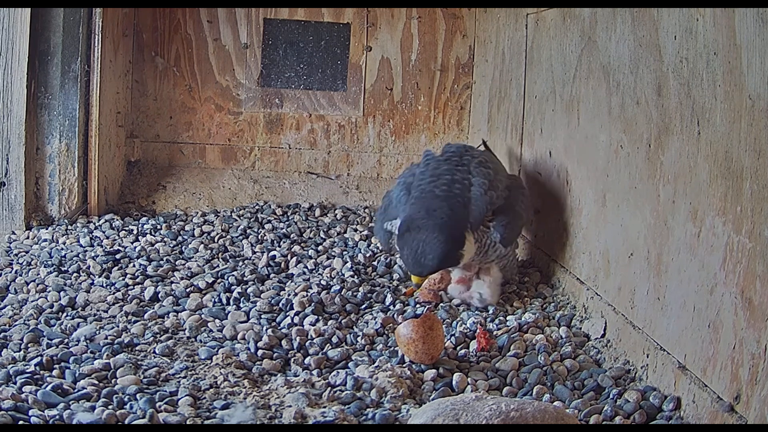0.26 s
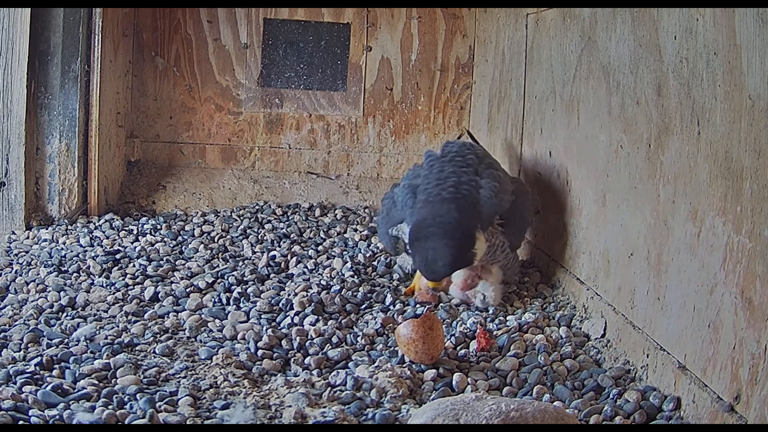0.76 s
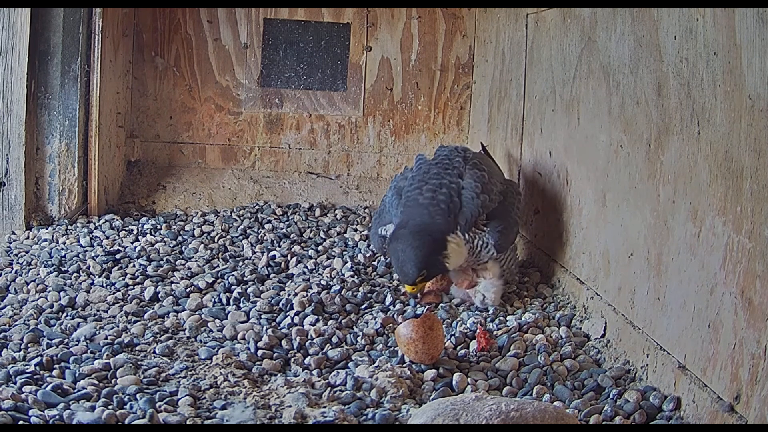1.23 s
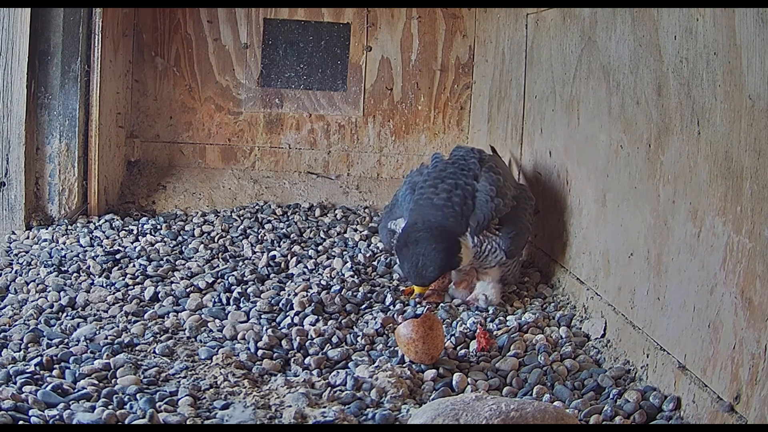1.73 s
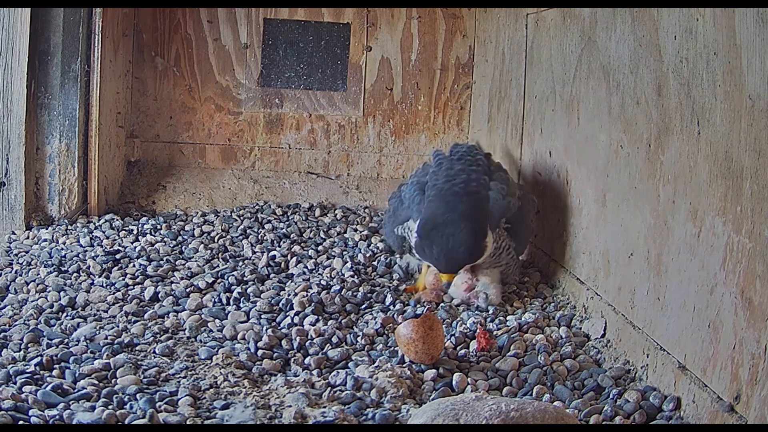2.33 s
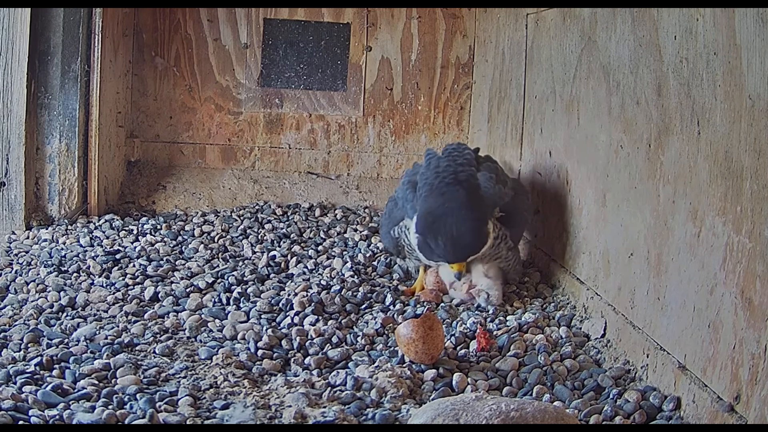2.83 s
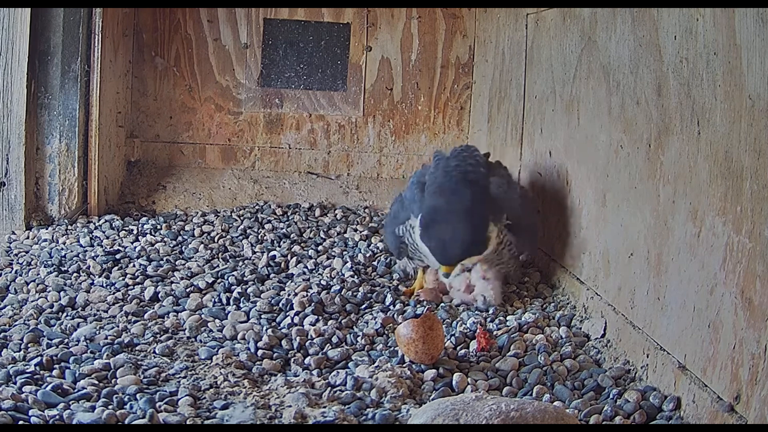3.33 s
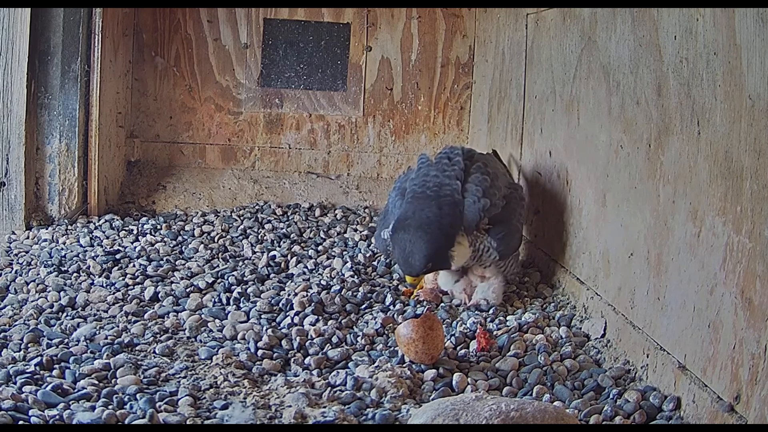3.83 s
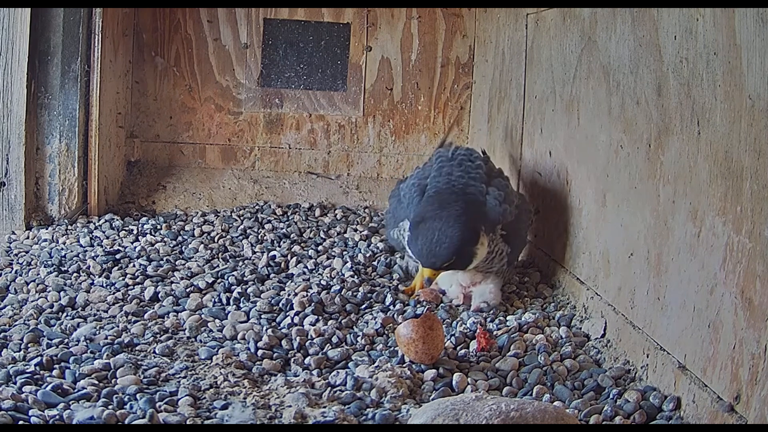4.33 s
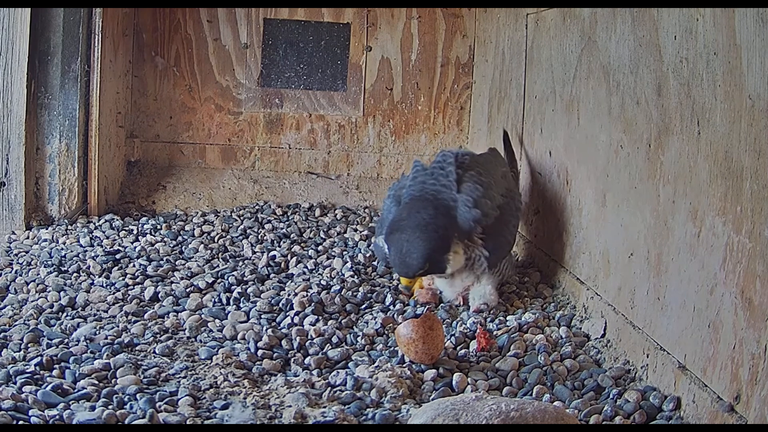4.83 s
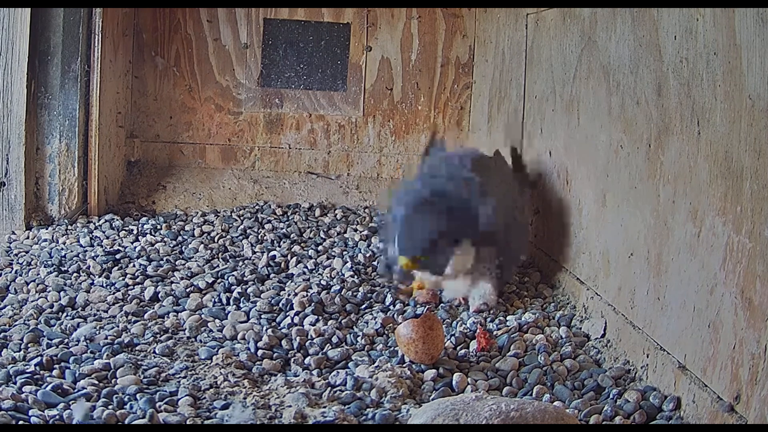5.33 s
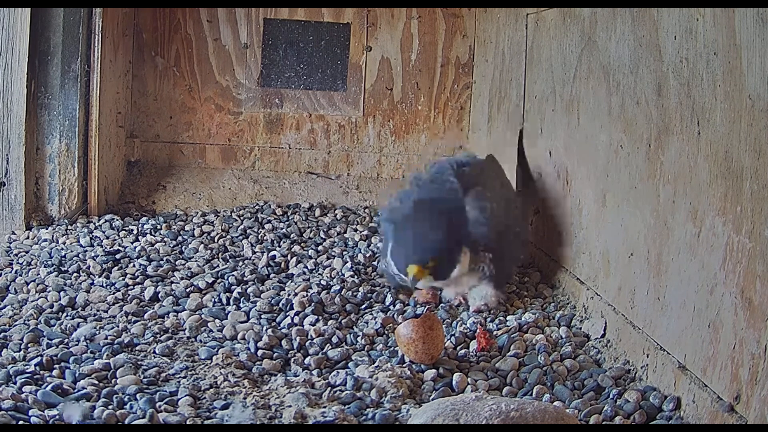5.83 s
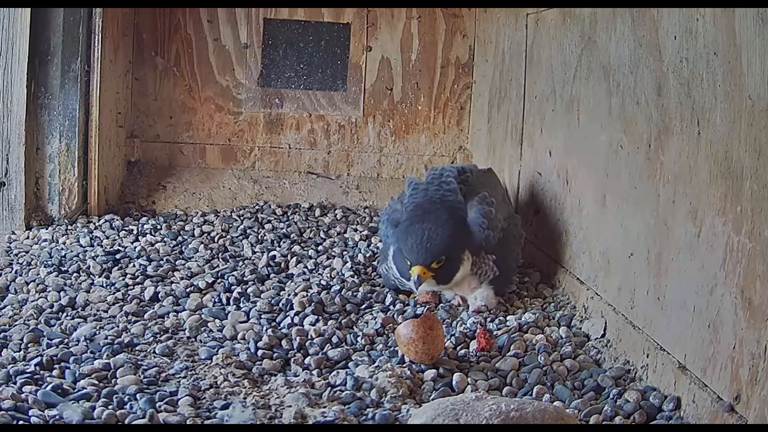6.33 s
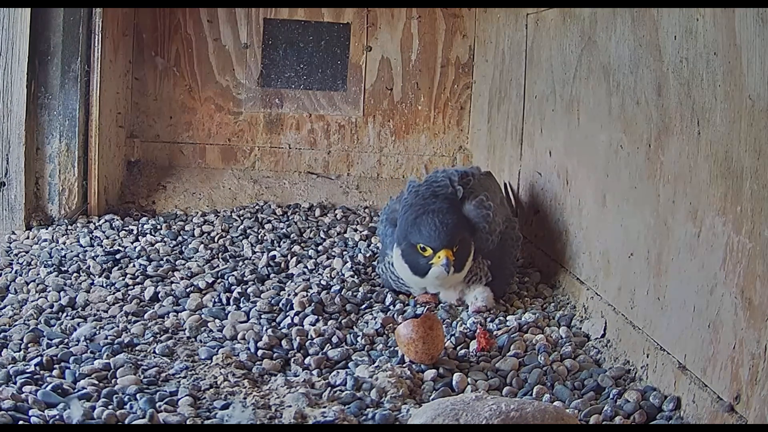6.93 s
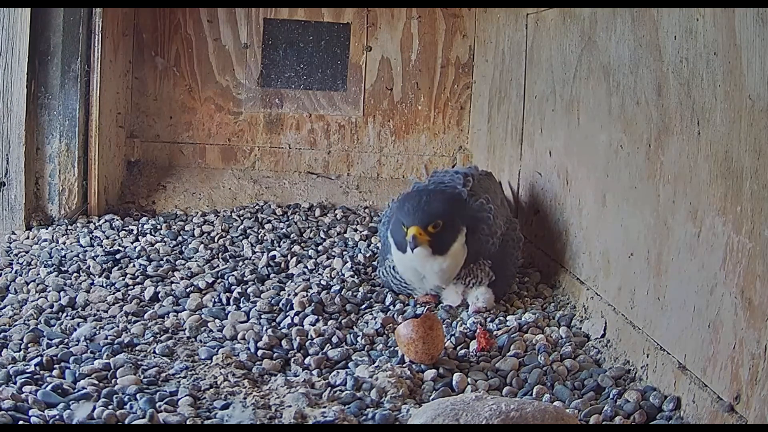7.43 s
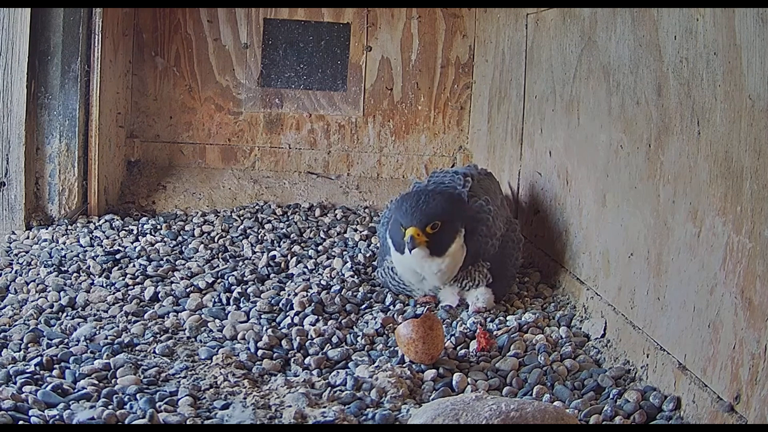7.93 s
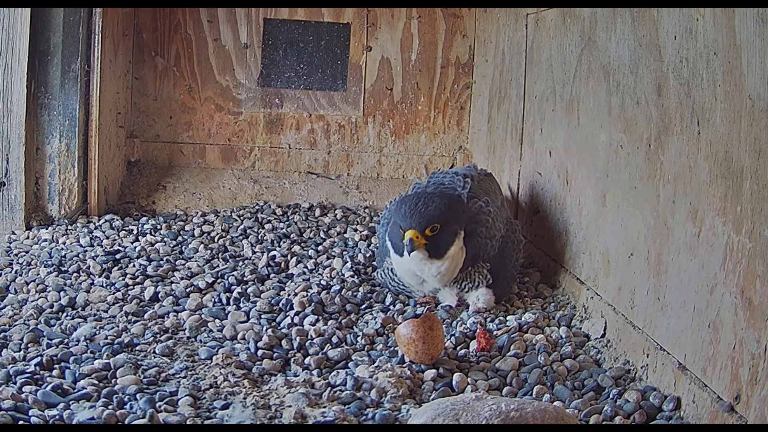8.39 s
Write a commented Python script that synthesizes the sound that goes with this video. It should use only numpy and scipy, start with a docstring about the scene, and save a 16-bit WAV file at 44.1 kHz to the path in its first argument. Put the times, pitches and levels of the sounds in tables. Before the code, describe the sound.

Falcon chicks peep about twice a second in a small wooden nest box, over steady electrical hum, faint hiss and soft outdoor rumble.

```python
"""Falcon chicks in a nest box

Falcon chicks peep about twice a second in a plywood nest box, and one faint squeak rises among them.
Each peep is an arching whistle that breaks into a rasp and drops to a short low note; noise echoes ring on.
Under it lie the camera's mains hum, faint whine and hiss, and an outdoor rumble that dies down near the end.
The camera's stream skips and stalls a few times, which ticks softly."""
import sys
import numpy as np
from scipy import signal
from scipy.fft import rfft, irfft, next_fast_len
from scipy.io import wavfile

SR = 44100
rng = np.random.default_rng(int(sys.argv[2]) if len(sys.argv) > 2 else 0)


def digitize_waveform(pressure):
    """Quantize a signal to 16-bit integers and store it at the path in sys.argv[1].

    Rows of a 2-D input are taken as channels; values are limited to [-1, 1].
    """
    field = np.atleast_2d(pressure).T
    bounded = np.clip(field, -1, 1)
    quanta = np.round(bounded * 32767).astype(np.int16)
    wavfile.write(sys.argv[1], SR, quanta)


N = 381906
TIME = np.arange(N) / SR


def undb(db):
    """Decibels to gain."""
    return 10 ** (np.asarray(db) / 20)


def unit(x):
    """Scale to rms 1."""
    return x / np.sqrt(np.mean(x ** 2))


def curve(rows, axis=1):
    """One column of a table, joined by straight lines in time."""
    rows = np.array(rows)
    return np.interp(TIME, rows[:, 0], rows[:, axis])


def response(hz, points):
    """Gain of a (f/Hz, level/dB) spectrum that drops 60 dB in the octave beyond each end."""
    f, db = np.transpose(points)
    f = np.r_[f[0] / 2, f, f[-1] * 2]
    db = np.r_[db[0] - 60, db, db[-1] - 60]
    return undb(np.interp(np.log(hz + 0.0013), np.log(f), db))  # the offset avoids log(0)


def colour(x, points):
    """Filter by a (f/Hz, level/dB) spectrum, to rms 1."""
    gain = response(np.fft.rfftfreq(len(x), 1 / SR), points)
    return unit(irfft(rfft(x) * gain, len(x)))


def noise(points):
    """Coloured noise of about rms 1."""
    return colour(rng.standard_normal(next_fast_len(N)), points)[:N]


def wander(hz, size):
    """Smooth random motion of rms 1, up to about hz."""
    n = next_fast_len(size)
    lowpass = np.exp(-.5 * (np.fft.rfftfreq(n, 1 / SR) / hz) ** 2)
    return unit(irfft(rfft(rng.standard_normal(n)) * lowpass, n)[:size])


def add(out, s, x):
    """Mix x into out from time s."""
    i = int(s * SR)
    out[i:i + len(x)] += x[:len(out) - i]


# spectrum of the low rumble: (f/Hz, level/dB)
RUMBLE_SPECTRUM = [(20, -16), (35, 3.5), (48, -6.5), (59, 7), (69, 10), (82, -3.5), (112, 1), (160, -2.5),
                   (182, -2), (215, -4), (300, -15.5), (900, -34.5)]
# level of the rumble, which dies down near the end: (t/s, level/dB)
RUMBLE_FADER = [(0, -45.5), (1.0, -47.5), (1.7, -52.5), (2.6, -51.5), (3.1, -47.5), (3.9, -52), (5.1, -49),
                (6.0, -49.5), (7.1, -58), (8.66, -59)]
# spectrum of the softer rush: (f/Hz, level/dB)
RUSH_SPECTRUM = [(200, -5), (330, 1.5), (450, 0.5), (620, -1), (750, -5), (1100, -8), (1600, -15),
                 (3000, -33.5), (6000, -36)]
# level of the rush, which comes in swells: (t/s, level/dB)
RUSH_FADER = [(0, -60), (.7, -61), (1.3, -64), (1.95, -64), (2.15, -61), (2.8, -60), (3.12, -59),
              (3.6, -64), (3.95, -62), (4.25, -59.5), (4.68, -62.5), (4.9, -55.5), (5.45, -60),
              (6.25, -61.5), (7.1, -65.5), (8.66, -65)]
# level of a narrow far drone: (t/s, level/dB)
DRONE_FADER = [(0, -78), (4.7, -79), (5.45, -60.5), (6.2, -66), (8.66, -80)]


def outdoors():
    """Two bands of noise, a low rumble and a rush above it, and a drone of randomly swelling tone."""
    rumble = noise(RUMBLE_SPECTRUM) * undb(curve(RUMBLE_FADER) + 0.36 * wander(7.8, N))
    rush = noise(RUSH_SPECTRUM) * undb(curve(RUSH_FADER) + 1.0 * wander(19, N))
    drone = wander(14, N) * np.sin(2 * np.pi * 587 * TIME) * undb(curve(DRONE_FADER))
    return rumble + rush + drone


# overtones of the mains hum: (multiple of the mains, level/dB against the fundamental)
HUM_PARTIALS = [(3, -22), (4, -37.5), (5, -25.5), (6, -31), (7, -32), (8, -32.5), (10, -43.5)]
MAINS_HZ = 50
HUM_DB, HUM_WAVER_DB, HUM_WAVER_HZ = -46, 1.0, 3.8
WHINE_HZ, WHINE_DB = 3340, -74
# spectrum of the microphone hiss: (f/Hz, level/dB)
HISS_SPECTRUM = [(600, -6), (1100, -0.5), (2000, 8.5), (3400, 5.5), (4600, 3), (7000, 0), (10000, -2),
                 (15900, -4.5)]


def camera(hiss_db):
    """Gently wavering harmonics of the mains, a thin whine of unsteady pitch and steady microphone hiss."""
    phase = 2 * np.pi * MAINS_HZ * TIME
    hum = np.cos(phase)
    for k, db in HUM_PARTIALS:
        hum = hum + undb(db) * np.cos(k * phase + rng.uniform(0, 2 * np.pi))
    # root two brings the fundamental to rms 1
    hum = np.sqrt(2) * hum * undb(HUM_DB + HUM_WAVER_DB * wander(HUM_WAVER_HZ, N))
    whine_phase = 2 * np.pi * np.cumsum(WHINE_HZ + 22 * wander(35.6, N)) / SR
    whine = np.sin(whine_phase) * undb(WHINE_DB + 4.1 * wander(12.0, N))
    hiss = noise(HISS_SPECTRUM) * undb(hiss_db)
    return hum + whine + hiss


# resonances of throat and beak: (f/Hz, level/dB)
THROAT_SPECTRUM = [(600, -10), (1100, -1), (1950, -10.5), (2400, -9.5), (2850, -3.5), (3850, -8),
                   (4400, -2), (5200, 0), (5900, -0.5), (6300, -11.5), (8000, -18), (10000, -26)]


def voice(hz, second_db=-8.0, third_db=-14.0, fourth_db=-15):
    """Four harmonics of the syrinx, shaped by throat and beak."""
    phase = 2 * np.pi * np.cumsum(hz) / SR
    sizes = [1, undb(second_db), undb(third_db), undb(fourth_db)]
    return sum(size * response(k * hz, THROAT_SPECTRUM) * np.sin(k * phase)
               for k, size in enumerate(sizes, 1))


RISE_S = .035  # the climb to the crest
ARCH_POWER = 1.4  # 1 is a pointed arch, 2 a parabola
# every peep ends with the same fall and low note; the arch takes the rest of its length
FALL_S, LOW_NOTE_S = .018, .025
DROP_HZ, END_HZ = 2123, 1626  # the low note slides from one to the other
# an easy peep starts, crests and breaks about these pitches; a strained one lifts all three
START_HZ, EASY_CREST_HZ, BREAK_HZ = 1843, 3002, 2686
START_LIFT, BREAK_LIFT = 1.7, .3  # Hz per Hz of extra crest
# offsets to the whistle level at its start and where it breaks
ONSET_DB, THIN_DB = -3.5, -0.5
THIN_DB_PER_HZ = -0.0041  # the more strained the peep, the more the tone thins
# second harmonic before the throat: the whistle is nearly pure, the low note bright
WHISTLE_OCTAVE_DB, LOW_NOTE_OCTAVE_DB = -12, -4
FLUTTER_HZ = 930  # mean rate of a second, slower vibration of the syrinx while it rasps


def peep(start, length, crest_hz, whistle_db, rasp_db, low_db):
    """A clear arching whistle; the syrinx turns chaotic, then settles on a low note rich in harmonics."""
    size = SR // 5
    t = start + np.arange(size) / SR
    crest, end = start + RISE_S, start + length
    drop = end - LOW_NOTE_S
    crack = drop - FALL_S

    strain = crest_hz - EASY_CREST_HZ
    start_hz = START_HZ + START_LIFT * strain
    crack_hz = BREAK_HZ + BREAK_LIFT * strain
    rise = crest_hz + (start_hz - crest_hz) * abs((t - crest) / RISE_S) ** ARCH_POWER
    sag = crest_hz + (crack_hz - crest_hz) * abs((t - crest) / (crack - crest)) ** ARCH_POWER
    fall = np.interp(t, [crack, drop, end], [crack_hz, DROP_HZ, END_HZ])
    hz = np.select([t < crest, t < crack], [rise, sag], fall)

    # chaos roughens the pitch and brings in the rasp
    chaos = np.interp(t, [crest - .01, (crest + crack) / 2, crack, drop, end],
                      [0.036, 0.87, 0.97, 0.82, 0.3])
    chaos = chaos * (t < end)
    hz = hz * (1 + (0.013 + 0.0259 * chaos) * wander(268, size))
    hz = hz * (1 + .018 * wander(55, size))  # the young voice wobbles

    # the tone swells to the crest, thins while it rasps and returns on the low note
    thin_db = whistle_db + THIN_DB + THIN_DB_PER_HZ * strain
    tone_db = np.interp(
        t, [start, crest - .006, crest + 0.0043, crack, drop - .006, drop + 0.0059, end],
        [whistle_db + ONSET_DB, whistle_db + 2.5, whistle_db + 2.0, thin_db, thin_db + 2.0,
         low_db + 5.0, low_db + 0.34])
    tone_db = tone_db + (2.0 + 0.6 * chaos) * wander(120, size)
    gate = np.clip(np.minimum(t - start, end + 0.001 - t) / 0.0058, 0, 1)
    octave_db = np.interp(t, [crack, drop], [WHISTLE_OCTAVE_DB, LOW_NOTE_OCTAVE_DB])
    tone = voice(hz, second_db=octave_db) * undb(tone_db) * gate

    # the second vibration chops the tone into rough sidebands and lets out puffs of noise
    flutter = np.cos(2 * np.pi * np.cumsum(FLUTTER_HZ * (1 + .11 * wander(120, size))) / SR)
    sidebands = colour(voice(hz) * flutter, THROAT_SPECTRUM)
    puffs = colour(rng.standard_normal(size) * (1 + 1.4 * flutter), THROAT_SPECTRUM)
    grain = .8 * puffs + .7 * sidebands
    rasp = grain * undb(rasp_db - 7.0 + 2.7 * wander(150, size)) * chaos
    return tone + rasp


# one faint rising squeak, before pitch jitter and throat: (t/s, f/Hz, level/dB)
SQUEAK_PATH = [(6.908, 1540, -80), (6.921, 1670, -52), (6.946, 1896, -54), (7.0, 2325, -61)]


def squeak():
    """The same voice sliding upward with a jittery pitch and weak overtones."""
    hz = curve(SQUEAK_PATH) * (1 + 0.0292 * wander(303, N))
    tone = voice(hz, second_db=-24, third_db=-22) * undb(curve(SQUEAK_PATH, axis=2))
    return tone * ((TIME > SQUEAK_PATH[0][0]) & (TIME < SQUEAK_PATH[-1][0]))


# peeps, with nominal crest and levels that peep() varies and shapes:
# (start t/s, length t/s, crest f/Hz, whistle level/dB, rasp level/dB, low note level/dB)
PEEP_CUES = [ (0.172, 0.1, 2840, -55.5, -65, -50), (0.563, 0.11, 3280, -55.5, -56.5, -50.5),
             (1.113, .11, 3010, -57.5, -62.5, -48.5), (1.651, 0.11, 2900, -57.5, -62, -50),
             (2.112, 0.11, 2900, -56, -67, -51.5), (2.53, .116, 3073, -56, -65, -49.5),
             (2.996, .13, 3643, -50.5, -47.5, -47.5), (3.389, 0.11, 3320, -53.5, -61, -50.5),
             (3.868, 0.11, 2960, -54.5, -63, -49), (4.281, 0.1, 2900, -57.5, -60, -49),
             (5.084, .103, 2975, -55.5, -68, -48.5), (5.761, 0.13, 3543, -53, -61, -49.5),
             (6.24, .113, 3476, -54.5, -55.5, -51.5), (6.683, 0.15, 3500, -56, -53, -72),
             (7.213, .136, 3635, -50, -51, -52.5), (7.634, 0.13, 3760, -51.5, -47.5, -49),
             (8.164, 0.12, 3130, -56.5, -61, -49.5)]


def chicks():
    """All the peeps and the faint squeak, summed dry."""
    out = squeak()
    for row in PEEP_CUES:
        add(out, row[0], peep(*row))
    return out


# spectrum of the long ring: (f/Hz, level/dB)
RING_SPECTRUM = [(500, -13), (1500, -7), (1950, -1), (2400, -0.5), (2950, 1.5), (3450, 1), (3860, 6.5),
                 (4400, -2), (5800, -1), (9000, -7.5)]


def nest_box(x, early_db, early_t60, late_db, late_t60):
    """Quick reflections between the plywood walls, then a long ring, both as decaying noise echoes."""
    t = TIME[:SR]
    chance = rng.standard_normal((2, SR))
    early = unit(chance[0] * np.exp(-np.log(1000) * t / early_t60) * (t > .002))
    late = chance[1] * np.exp(-np.log(1000) * t / late_t60) * np.clip(t / 0.016, 0, 1)
    late = colour(late, RING_SPECTRUM)
    echo = (undb(early_db) * early + undb(late_db) * late) / np.sqrt(SR)  # rms to energy
    return x + signal.fftconvolve(x, echo)[:N]


def scene():
    """Chicks in the box over the outdoor and camera background."""
    birds = nest_box(chicks(), early_db=-4, early_t60=0.098, late_db=-5, late_t60=1.0)
    return (birds + outdoors() + camera(hiss_db=-67.0))[None]


# runs of stream hiccups; a positive slip skips ahead, a negative one stalls and falls behind:
# (first t/s, count, spacing t/s, slip t/s, click level/dB)
HICCUP_RUNS = [(.4306, 1, 0, -.0022, -41), (5.925, 3, .075, .006, -58), (6.2563, 2, .056, -.0055, -44)]
SPLICE_S = 0.0057  # crossfade over a slip
CLICK_S = 0.00055  # decay of a click
STALL_DB = -8  # gain during a stall
TOP_HZ = 15600


def record(dry):
    """The camera's stream jumps in time with a click, dipping while it stalls; a steep low-pass cuts the top."""
    stream = dry
    for first, count, spacing, slip, click_db in HICCUP_RUNS:
        for s in first + spacing * np.arange(count):
            slipped = stream[:, np.clip(np.arange(N) + int(slip * SR), 0, N - 1)]
            fade = np.clip((TIME - s) / SPLICE_S, 0, 1)
            stalled = (TIME >= s) & (TIME < s - slip)  # empty when the slip is positive
            click = undb(click_db) * np.exp(-abs(TIME - s) / CLICK_S) * (TIME >= s)
            spliced = stream + fade * (slipped - stream)
            stream = spliced * undb(STALL_DB * stalled) + click
    return signal.sosfilt(signal.ellip(12, .1, 70, TOP_HZ, fs=SR, output="sos"), stream)


dry = scene()
out = record(dry)
digitize_waveform(out)
```